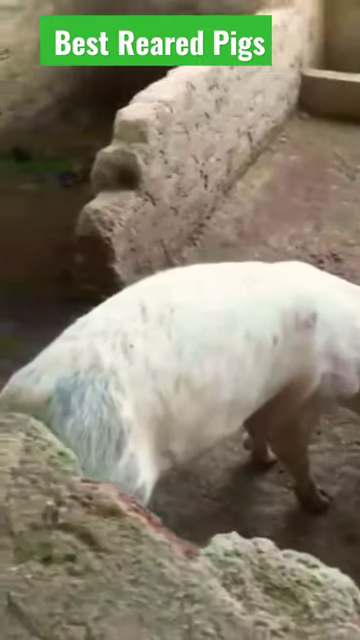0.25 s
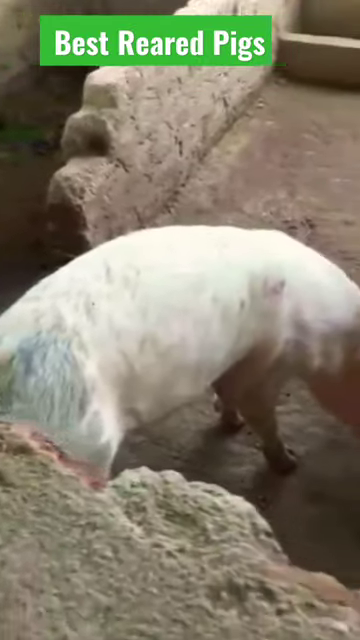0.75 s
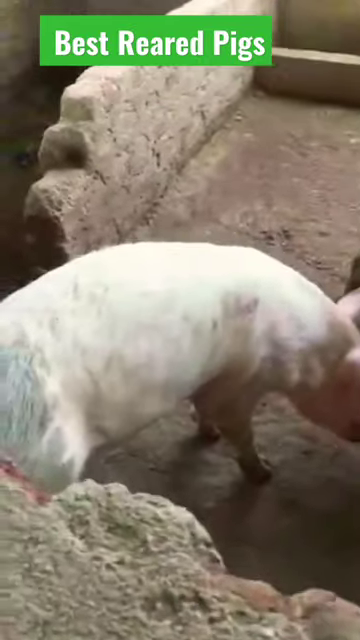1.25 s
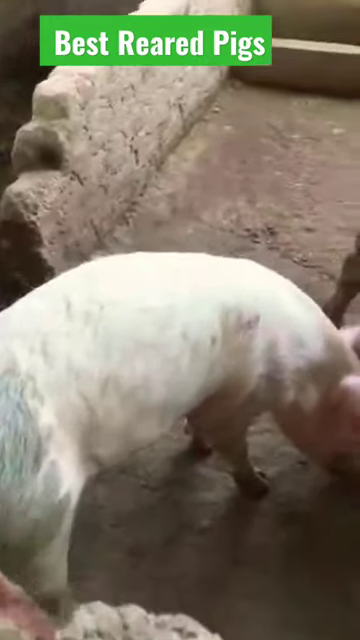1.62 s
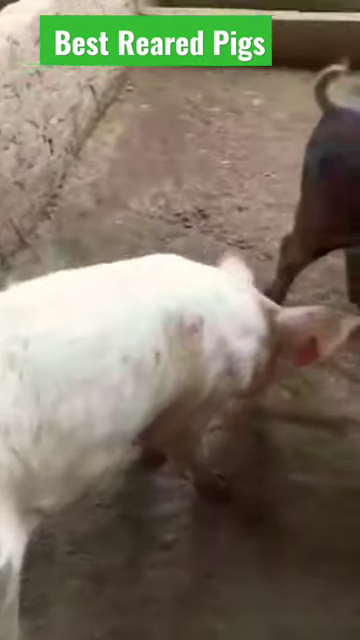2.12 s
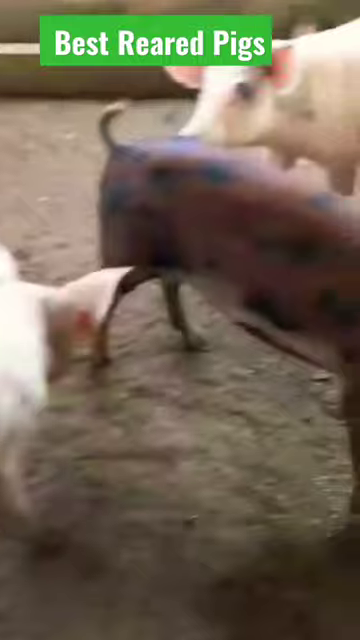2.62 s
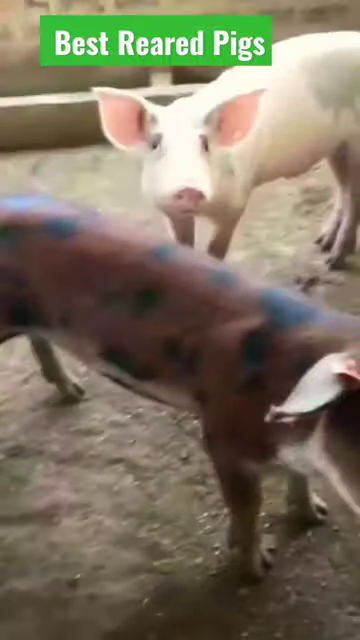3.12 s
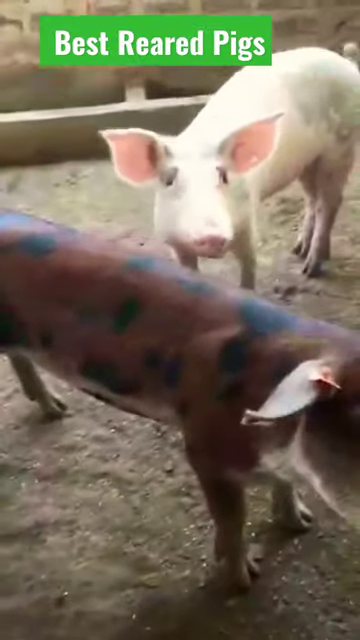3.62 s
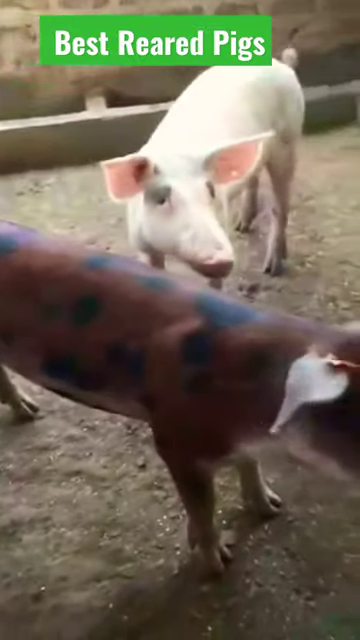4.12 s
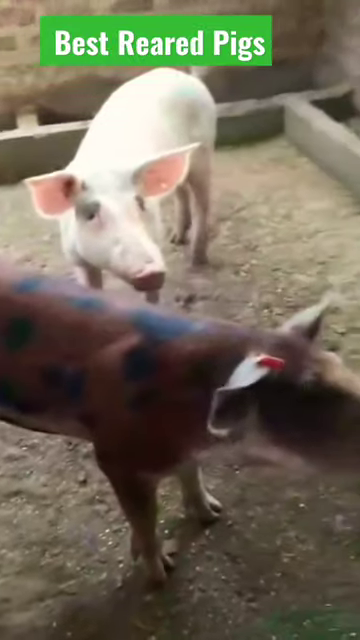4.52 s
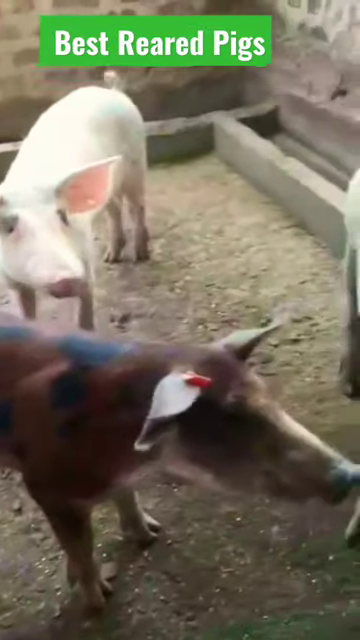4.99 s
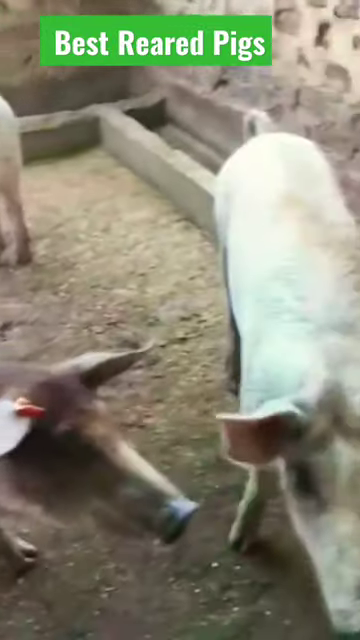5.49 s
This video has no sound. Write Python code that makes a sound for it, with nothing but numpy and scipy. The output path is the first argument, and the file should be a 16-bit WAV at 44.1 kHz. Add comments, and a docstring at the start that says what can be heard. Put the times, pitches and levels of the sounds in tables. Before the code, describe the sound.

In a concrete pen, several pigs shuffle, smack wetly and click their hooves throughout. A thin falling whistle comes early, then a low breathy grunt nearby. A faint distant whine follows, then a rougher breathy grunt, a stronger grunt with almost no breath, and a final rising whine. Wind thumps softly on the close handheld microphone, and the walls return a short echo.

```python
"""Pigs in a hard-walled pen, with smacking lips, hoof clicks and shuffling all the way through. Wind buffets
the microphone throughout. A thin whistle falls once, then a slow, breathy grunt follows close by. Next come a
faint whine farther off, a second breathy grunt, a third with hardly any breath, and a last whine that climbs.
Smacks are noise bursts ringing two cavities, grunts are pulses and breath through resonances, whines are
harmonics, the whistle is a wavering tone, shuffle and wind are shaped noise; the walls add a short echo."""
import sys
import numpy as np
from scipy import signal
from scipy.fft import rfft, irfft
from scipy.io import wavfile
from scipy.ndimage import uniform_filter1d

SR = 44100
rng = np.random.default_rng(int(sys.argv[2]) if len(sys.argv) > 2 else 0)


def store_wav(level_fs):
    """Save 16-bit WAV to argv[1]."""
    pcm = np.round(np.clip(np.atleast_2d(level_fs), -1, 1) * 32767)
    wavfile.write(sys.argv[1], SR, pcm.T.astype(np.int16))


N = 253575

# Chance peaks in the low wind noise, placed one by one. Each row: middle in seconds, level in dB, pitch in Hz,
# width at half height in seconds (never taken shorter than 0.003).
WIND_PEAKS = [(0.569, -29.5, 70, 0.037), (0.719, -26, 99, 0.0073), (0.789, -28, 94.5, 0.0072),
              (0.808, -28, 66.5, 0.023), (0.91, -28.5, 94, 0.0073), (1.105, -19, 87, 0.0022),
              (1.127, -27.5, 88, 0.0074), (1.302, -39, 65.3, 0.032), (1.777, -29.5, 59, 0.03),
              (1.896, -18.5, 140, 0.0075), (1.95, -25.5, 71, 0.019), (2.02, -20.5, 101, 0.0091),
              (2.276, -29, 102, 0.016), (2.465, -30, 94, 0.0024), (2.626, -27, 71, 0.013),
              (2.835, -30.5, 86, 0.026), (3.12, -34, 69, 0.025), (4.365, -30.5, 89.5, 0.012),
              (4.928, -21.5, 79, 0.0075), (4.971, -29, 90, 0.0036), (5.003, -31, 81, 0.013),
              (5.066, -15, 123, 0.012), (5.137, -14, 57, 0.0023), (5.307, -32.5, 109.6, 0.062),
              (5.425, -26, 89, 0.012), (5.611, -22, 90, 0.019), (5.677, -28.5, 75, 0.022)]
# Wind over time. Each row: time in seconds, rumble level in dB, flutter in dB compared with the rumble.
WIND = [(0, -60.5, -7.5), (0.15, -45.5, -15), (0.27, -65, -2), (0.5, -49.5, -18), (1.55, -45.5, -19.5),
        (1.68, -49, -19), (1.95, -24.5, -16.5), (2.12, -41.5, -17), (2.3, -36, -29), (2.37, -53.5, -21),
        (2.44, -37.5, -14), (2.55, -38.5, -35), (2.75, -50, -16.5), (3.25, -54, -5.5), (3.9, -64.5, 1.5),
        (4.22, -41.5, -9), (4.42, -50, -12.5), (4.52, -67, 2.5), (4.8, -57.5, -10.5), (4.95, -37.5, -17),
        (5.44, -34.5, -12.5), (5.62, -35.5, -11), (5.75, -48.5, -7)]
# Feet and snouts shuffling. Each row: time in seconds, resting level in dB, grit in dB compared with the level.
SHUFFLE = [(0, -43, -12), (0.15, -51, -9.5), (0.53, -57.5, -10.5), (0.75, -47, -15), (1.15, -52, -17),
           (1.3, -56.5, -9.5), (1.72, -55, -8), (2.25, -49, -14.5), (2.38, -52, -15.5), (2.55, -52, -0.5),
           (2.85, -52.5, -13), (3.12, -46.5, -9.5), (3.25, -43.5, -11.5), (3.6, -53.5, -17),
           (4.02, -50, -4.5), (4.6, -46, -11.5), (4.85, -56.5, -7), (5.1, -44.5, -7), (5.4, -41, -8),
           (5.55, -42, -14), (5.66, -41.5, -13.5), (5.75, -36, -9)]
# Tone colour of the shuffle. Each row: frequency in Hz, relative strength in dB per Hz.
SHUFFLE_TONE = [(210, -72), (350, -8.5), (600, -3), (950, -0.5), (1460, 0), (2690, -9), (3270, -10),
                (5500, -22), (7150, -39), (12100, -120)]
# Tone colour of wet hiss and grit. Each row: frequency in Hz, relative strength in dB per Hz.
HISS_TONE = [(2650, -0.5), (4500, -0.5), (6650, -4), (7570, -5.5), (9100, -8.5), (11900, -17.5),
             (13100, -64)]
# The falling whistle. Each row: time in seconds, pitch in Hz, level in dB.
WHISTLE = [(1.45, 7450, -86), (1.47, 7300, -75), (1.5, 6930, -67), (1.54, 6080, -58), (1.57, 5680, -71),
           (1.61, 5780, -57)]
# Hoarse whines from farther off. Each row: start, loudest moment and end in seconds, first and last pitch in Hz,
# top level in dB, level at start and end in dB compared with the top.
WHINES = [(3.277, 3.325, 3.6, 316, 318.5, -56.5, -34), (5.498, 5.734, 5.9, 323.5, 463, -49.5, -14)]
# Whine harmonics, lowest first. Each entry: relative level in dB.
WHINE_PARTIALS_DB = [4, 0, -31, -13]
# Resonances of the nose. Each row: frequency in Hz, width in Hz, relative level in dB.
SNOUT = [(616, 67, -4), (936, 145, -7.5), (1375, 69, 3), (1777, 84, 0.5), (2220, 130, -2), (2690, 80, -16),
         (3080, 220, -10.5), (3780, 176, -6), (4390, 88, -15), (5870, 1350, -27.5)]
# Upper resonances of the throat. Each row: frequency in Hz, width in Hz, typical level in dB.
THROAT = [(660, 71, -5), (1334, 99, -3.5), (1725, 110, -1), (2270, 88, 5)]
# Grunts. Each row: start, loudest moment and end in seconds, first and last pulses per second,
# pulse level in dB, pulse fade in dB per second, loudest breath in seconds, breath level in dB,
# mouth low-pass at the loudest moment in Hz, chest boom in dB, first and last pharynx resonance in Hz,
# timing spread of the pulses as a share of the first cycle.
GRUNTS = [(1.718, 1.806, 2.08, 31.02, 30.86, -30.5, 6.3, 1.85, -34, 360, -3, 331, 167, 0.052),
          (4.045, 4.214, 4.47, 44.07, 50.8, -32.5, 230, 4.21, -32.5, 430, -4, 288, 220, 0.14),
          (5.154, 5.211, 5.52, 27.42, 32.76, -22, 63, 5.33, -69, 1000, -1, 357, 168, 0.02)]
# Smacks and hoof clicks. Each row: time in seconds, level in dB, low and high cavity in Hz,
# high cavity in dB and wet hiss in dB (both compared with the level), length in seconds.
SMACKS = [(0.01, -30, 1194, 1900, -11, -15, 0.0031), (0.015, -38.5, 1620, 2000, 0, -4.5, 0.013),
          (0.182, -38.5, 1620, 1840, -8, -13, 0.01), (0.292, -34, 1330, 2700, 0, -24, 0.012),
          (0.317, -24, 1620, 2880, -11.5, -15, 0.025), (0.384, -30, 1360, 2330, -8, -40, 0.0062),
          (0.58, -42, 1055, 3560, -4.5, -46, 0.016), (0.611, -41, 970, 2070, -6, -8.5, 0.014),
          (0.69, -36.5, 1300, 2970, -8.5, -46, 0.023), (0.785, -39, 1500, 2430, -22, -26, 0.0054),
          (0.807, -28.5, 1405, 1975, 1, -6, 0.0078), (0.967, -37, 985, 3350, -7.5, -30, 0.01),
          (0.993, -31, 1430, 2870, -8, -10.5, 0.0073), (1.078, -37, 950, 1470, -10, -39, 0.0076),
          (1.104, -36.5, 1120, 3190, -7.5, -50, 0.016), (1.202, -33.5, 1300, 1830, -7.5, -23, 0.01),
          (1.333, -34, 1310, 3460, -6.5, -23, 0.012), (1.427, -37, 930, 1570, -8, -43, 0.034),
          (1.641, -30.5, 1286, 1620, -5.5, -20, 0.01), (1.662, -36.5, 1150, 3750, -10, -11.5, 0.0078),
          (2.08, -45.5, 1600, 3330, -1, -16, 0.018), (2.104, -39, 1610, 2440, -4, -3, 0.014),
          (2.143, -27, 1160, 1666, -1, -14, 0.0054), (2.167, -35.5, 1310, 1910, -7, -17, 0.0071),
          (2.183, -35, 791.3, 1510, -17, -35, 0.0022), (2.244, -38.5, 1290, 2130, -9, -28, 0.025),
          (2.276, -45, 1000, 3400, 7, 3, 0.0038), (2.313, -40, 955, 2200, -30, -43, 0.018),
          (2.424, -39.5, 1180, 3780, -7, -28, 0.014), (2.451, -40, 433, 910, -4, -33, 0.018),
          (2.479, -29.5, 1465, 2620, -10, -21, 0.011), (2.507, -44.5, 1540, 3600, -4, 0.5, 0.0086),
          (2.547, -31, 1320, 2060, 6, -9.5, 0.0061), (2.593, -37.5, 935, 2340, -3.5, -30, 0.0027),
          (2.615, -36, 905, 1500, -8.5, -30, 0.005), (2.652, -46, 905, 1800, -15, -35, 0.0044),
          (2.678, -38.5, 1680, 2210, -9, -24, 0.0031), (2.731, -32, 1280, 2260, -3.5, -41, 0.0018),
          (2.817, -39.5, 1086, 2330, -25, -35, 0.012), (2.901, -40, 597, 1480, -20, -47, 0.023),
          (3.007, -22, 1185, 1976, 0.5, -11.5, 0.004), (3.281, -48, 593, 2070, 1, -0.5, 0.013),
          (3.325, -22.5, 1124, 1590, -5, -53, 0.0039), (3.351, -32, 900, 1700, -29, -43, 0.0043),
          (3.418, -41, 1060, 2680, 3, -3.5, 0.0065), (3.459, -20, 1397, 1620, -6, -10.5, 0.0034),
          (3.662, -21.5, 1357, 3120, -15, -9.5, 0.011), (3.755, -29, 1010, 3950, -21, -10, 0.0037),
          (3.777, -44.5, 1130, 2690, 11.5, 4.5, 0.003), (3.836, -38, 1150, 1870, -13, -37, 0.0067),
          (3.9, -23, 1110, 1920, -16, -22, 0.0099), (4.06, -31, 1080, 2170, -16, -19, 0.017),
          (4.127, -24, 1390, 2340, -2.5, -17, 0.0058), (4.179, -24, 660, 938, -5.5, -27, 0.0023),
          (4.228, -25, 1530, 2840, -3.5, -10.5, 0.015), (4.255, -30.5, 1440, 1860, 1, -14, 0.0098),
          (4.301, -34.5, 1205, 3000, 3.5, 1.5, 0.0033), (4.483, -27, 1480, 3230, -4, -0.5, 0.0048),
          (4.579, -30.5, 1010, 1400, -11, -20.5, 0.0052), (4.593, -39, 1250, 2290, -2, -37, 0.005),
          (4.657, -37.5, 1590, 2300, -8, -14, 0.0068), (4.673, -39.5, 1560, 2900, -5, -10.5, 0.017),
          (4.726, -29.5, 685, 1310, -1, -7.5, 0.005), (4.878, -39.5, 930, 1470, -27, -22, 0.014),
          (4.908, -44, 1380, 2930, -7.5, -24, 0.014), (4.973, -38.5, 640, 1380, -19, -23, 0.0025),
          (4.986, -33, 1020, 2050, -14, -27, 0.014), (5.005, -23.5, 1105, 2040, -6, -19, 0.0082),
          (5.057, -39.5, 1540, 3300, 6.5, 2.5, 0.021), (5.086, -28.5, 1550, 2490, -2.5, -11.5, 0.0088),
          (5.122, -28.5, 1830, 2180, 2.5, -39, 0.0037), (5.322, -21.5, 1072, 1780, -14, -17, 0.0082),
          (5.413, -34, 664, 1020, -6, -37, 0.017), (5.455, -32.5, 1320, 4020, -19, 9.5, 0.0029),
          (5.475, -29, 1390, 2250, -5, -12, 0.01), ]

PEN_T60_S, PEN_TREBLE_T60_S = 0.24, 0.19  # time for the echo to fall by 60 dB
PEN_DB = -8.5
GRUNT_PEN_DB = -6  # the grunts are near, so the walls add less
# Each smack stirs the shuffle up; the kick is set this far under the smack's level.
STIR_DB, STIR_RISE_S, STIR_FADE_S = -25.5, 0.006, 0.032
GRUNT_ATTACK_S, PULSE_SWELL_DB_PER_S = 0.017, 68
BREATH_SWELL_DB_PER_S, BREATH_FADE_DB_PER_S = 137, 138
FIRST_PULSE = 0.7  # share of a cycle already gone when a grunt starts
CHEST_HZ = 186
PHARYNX_WIDTH_HZ = 67  # the pharynx resonance sinks through a grunt
MOUTH_CLOSES_TO = 0.24  # share of the mouth low-pass left at the end of a grunt
SHARPNESS = 5.5  # cavity frequency divided by its width
LEAD_S, LEAD_DB = 0.012, -17  # faint sound ahead of each smack
LONGEST_RISE_S, SPRAY_RISE_S = 0.003, 0.006
CUTOFF_HZ = 13450  # from here up, the sound is at least 30 dB down


def amp(db):
    """Turn dB into gain."""
    return 10 ** (np.asarray(db) / 20)


def rms_one(x):
    """Scale a sound to an average strength (rms) of 1."""
    return x / np.sqrt(np.mean(x ** 2) + 1e-20)


def in_time(rows, **outside):
    """Draw straight lines between table rows, giving each column a value at every sample."""
    s, *columns = np.transpose(rows)
    t = np.arange(N) / SR
    return [np.interp(t, s, column, **outside) for column in columns]


def coloured(spectrum):
    """Noise with a given tone colour, rms 1."""
    hz, db = np.transpose(spectrum)
    bins_hz = np.arange(N // 2 + 1) * SR / N + 1  # the 1 avoids log(0)
    shape = amp(np.interp(np.log(bins_hz), np.log(hz), db, left=-90, right=-90))
    return rms_one(irfft(rfft(rng.standard_normal(N)) * shape, N))


def band(x, low_hz, high_hz):
    """Keep the sound between two frequencies."""
    return signal.sosfilt(signal.butter(2, [low_hz, high_hz], "band", fs=SR, output="sos"), x)


def drift(rate_hz):
    """Smoothed random wandering, rms 1; a higher rate wanders faster."""
    r = np.exp(-2 * np.pi * rate_hz / SR)
    settled = signal.lfilter([1], [1, -2 * r, r * r], rng.standard_normal(N + SR))[SR:]
    return rms_one(settled)


def resonance(x, hz, width_hz):
    """One ringing resonance with gain 1 at its top."""
    r = np.exp(-np.pi * width_hz / SR)
    feedback = [1, -2 * r * np.cos(2 * np.pi * hz / SR), r * r]
    return signal.lfilter(np.array([1, 0, -1]) * (1 - r * r) / 2, feedback, x)


def tract(x, modes):
    """Resonances side by side with alternating signs, each steepened by a second, wider one."""
    out = 0
    for k, (hz, width, db) in enumerate(modes):
        steep = resonance(resonance(x, hz, 7.1 * width), hz, width)
        out = out + (-1) ** k * amp(db) * steep
    return out


def peaked(t, top_s, top_db, swell_db_per_s, fade_db_per_s):
    """Gain that swells to a peak and fades, straight in dB."""
    drop_db = np.where(t < top_s, swell_db_per_s * (top_s - t), fade_db_per_s * (t - top_s))
    return amp(top_db - drop_db)


def pen(x, first_echo_s=0.0025):
    """Dense wall reflections, made of fading noise; the treble dies sooner."""
    t = np.arange(SR // 2) / SR
    noise = rng.standard_normal((2, len(t)))
    low = band(noise[0], 110, 4800) * amp(-60 * t / PEN_T60_S)
    treble = band(noise[1], 5240, 10600) * amp(-60 * t / PEN_TREBLE_T60_S)
    tail = (low + treble) * (1 - np.exp(-(t / first_echo_s) ** 2))
    tail /= np.sqrt(np.sum(tail ** 2))
    return amp(PEN_DB) * signal.fftconvolve(x, tail)[:N]


def wind(lumpy_db=2.0):
    """Lumpy low noise on the microphone, with chance peaks placed one by one as short swells of a low tone."""
    rumble_db, flutter_db = in_time(WIND)
    rumble = rms_one(band(band(rng.standard_normal(N), 42, 110), 30, 230))
    flutter = rms_one(band(rng.standard_normal(N), 158, 333))
    flutter_gain = amp(flutter_db + 3.0 * drift(18.7))
    out = amp(rumble_db + lumpy_db * drift(9.4)) * (rumble + flutter_gain * flutter)
    t = np.arange(N) / SR
    phases = rng.uniform(0, 2 * np.pi, len(WIND_PEAKS))
    for (s, db, hz, width), phase in zip(WIND_PEAKS, phases):
        near = slice(round((s - .06) * SR), round((s + .06) * SR))
        since = t[near] - s
        swell = np.exp(-np.log(16) * (since / max(width, .003)) ** 2)
        out[near] += amp(db) * swell * np.cos(2 * np.pi * hz * since + phase)
    return out


def stir():
    """Gain that rises after each smack and settles again."""
    s, db = np.transpose(SMACKS)[:2]
    kicks = np.zeros(N)
    kicks[(s * SR).astype(int)] = amp(db + STIR_DB)
    rise, fade = np.exp(-1 / (STIR_RISE_S * SR)), np.exp(-1 / (STIR_FADE_S * SR))
    fading = signal.lfilter([1], [1, -fade], kicks)
    return signal.lfilter([1 - rise], [1, -rise], fading)


def shuffle(ticks_per_s=10.0, tick_db=-11, crackle_db=-0.5):
    """A noise bed that wavers band by band, with small random ticks, each with a colour of its own."""
    level_db, grit_db = in_time(SHUFFLE)
    grit_gain = amp(grit_db + crackle_db * drift(150) + 3.6 * drift(5.2))
    texture = coloured(SHUFFLE_TONE) + grit_gain * coloured(HISS_TONE)
    bed = (amp(level_db) + stir()) * texture
    moments = (rng.random(N) < ticks_per_s / SR) * amp(rng.normal(0, 3.3, N))
    together = drift(13.0)  # wavering shared by all bands
    edges_hz = np.geomspace(200, 14000, num=15)
    out = 0
    for low, high in zip(edges_hz, edges_hz[1:]):
        sizes = moments * amp(3.5 * np.minimum(rng.exponential(1, N), 3))
        softened = uniform_filter1d(sizes, size=120)
        ticks = signal.lfilter([1], [1, -np.exp(-1 / (0.033 * SR))], softened)  # 33 ms fade
        waver_db = 1.5 * (together + drift(20))
        out = out + band(bed, low, high) * (amp(waver_db) + amp(tick_db) * ticks)
    return out


def whistle(breathy_hz=250):
    """A gliding tone whose randomly wavering strength blurs it into a narrow band of noise."""
    hz, db = in_time(WHISTLE)
    sounding = in_time(WHISTLE, left=0, right=0)[0] > 0
    tone = np.sin(2 * np.pi * np.cumsum(hz) / SR)
    return sounding * amp(db) * (drift(breathy_hz) + 0.79) * tone


def whines(waver=0.0119, hoarse_db=2.5):
    """A few harmonics of unsteady strength on a wavering pitch that climbs, slightly or clearly."""
    out, t = 0, np.arange(N) / SR
    for start, top, end, first_hz, last_hz, db, edge_db in WHINES:
        hz = np.interp(t, [start, end], [first_hz, last_hz])
        phase = 2 * np.pi * np.cumsum(hz * (1 + waver * drift(27.3))) / SR
        swell_db = edge_db * np.interp(t, [start, top, end], [1, 0, 1])
        gain = amp(db + swell_db) * (t > start) * (t < end)
        for k, part_db in enumerate(WHINE_PARTIALS_DB):
            strength = amp(part_db + hoarse_db * drift(32))
            out = out + gain * strength * np.sin((k + 1) * phase)
    return out


def grunts(gate=.3, rough_db=1.5, rasp_db=2.3):
    """Vocal folds open in slow pulses and ring a throat that lengthens; breath gated by them hisses in the snout."""
    voice, breath, t = np.zeros(N + SR), 0, np.arange(N) / SR
    for (start, top, end, first_rate, last_rate, pulse_db, fade, breath_top, breath_db,
         mouth_hz, chest_db, first_hz, last_hz, jitter) in GRUNTS:
        on = (t >= start) & (t < end)
        rate = np.interp(t, [start, end], [first_rate, last_rate])
        cycle = np.cumsum(on * rate) / SR + FIRST_PULSE
        attack = np.clip((t - start) / GRUNT_ATTACK_S, 0, 1)
        effort = attack * peaked(t, top, pulse_db, PULSE_SWELL_DB_PER_S, fade)
        pulse_starts = np.flatnonzero(np.diff(np.floor(cycle)))
        chance = rng.standard_normal((30, 2 + len(THROAT)))  # one row per pulse
        for at, (late, strong, *tints) in zip(pulse_starts, chance):
            pharynx_hz = np.interp(t[at], [start, end], [first_hz, last_hz])
            opening = np.interp(t[at], [top, end], [1, MOUTH_CLOSES_TO])
            click = np.eye(1, SR // 20)[0]
            puff = signal.lfilter(*signal.butter(3, mouth_hz * opening, fs=SR), click)
            lower = [(CHEST_HZ, 70, chest_db), (pharynx_hz, PHARYNX_WIDTH_HZ, 0)]
            upper = [(hz, width, db + 2 * rough_db * tint)
                     for (hz, width, db), tint in zip(THROAT, tints)]
            pulse = tract(puff, lower + upper)
            at += round(jitter * late * SR / first_rate)
            gain = effort[at] * amp(rough_db * strong)
            voice[at:at + len(pulse)] -= gain * pulse / np.abs(pulse).max()
        flow = peaked(t, breath_top, breath_db, BREATH_SWELL_DB_PER_S, BREATH_FADE_DB_PER_S)
        # breath is strongest as each pulse begins
        breath = breath + on * flow * (1 - gate + gate * np.exp(-3.0 * (cycle % 1)))
    snout_noise = rms_one(tract(rng.standard_normal(N), SNOUT))
    return voice[:N] + breath * amp(rasp_db * drift(94)) * snout_noise


def smacks(rise_share=0.533, snap=10.1, ring_db=-8, crackle_db=6.0):
    """A short burst of noise rings two cavities and carries a wet hiss with a colour of its own."""
    out = np.zeros(N + SR)
    t = np.arange(SR // 6) / SR - LEAD_S
    since = np.maximum(t, 0)
    lead = amp(LEAD_DB) * np.exp(-4 * np.abs(t) / LEAD_S)  # a faint wet sound runs ahead
    hiss = coloured(HISS_TONE) * amp(crackle_db * drift(400))  # spray comes in droplets
    noises = rng.standard_normal((len(SMACKS), len(t)))
    lowest_hz, highest_hz = [3090, 4120, 5920, 8020], [4420, 6250, 7820, 10900]
    hiss_hz = rng.uniform(lowest_hz, highest_hz, (len(SMACKS), 4))
    for (s, db, low_hz, high_hz, high_db, hiss_db, length), noise, tints in zip(SMACKS, noises, hiss_hz):
        at, length = max(round((s - LEAD_S) * SR), 0), max(length, .001)
        rise = 1 - np.exp(-(since / min(rise_share * length, LONGEST_RISE_S)) ** 2)
        burst = lead + rise * np.exp(-(since / (1.443 * length)) ** 1.23)
        burst /= burst.max()
        strike = burst * noise
        strike[np.argmax(burst)] += snap  # the lips part with one snap
        rings = []
        for hz in (low_hz, high_hz):
            body = resonance(resonance(strike, hz, hz / SHARPNESS), hz, 2 * hz / SHARPNESS)
            after = resonance(body, hz, 130)  # a narrow resonance sings on
            rings.append(body / np.abs(body).max() + amp(ring_db) * after / np.abs(after).max())
        spray = np.resize(hiss[at:], len(t))
        tinted = rms_one(0.61 * spray + sum(resonance(spray, hz, 270) for hz in tints))
        wet = (lead + burst * (1 - np.exp(-since / SPRAY_RISE_S))) * tinted
        smack = 0.54 * rings[0] + amp(high_db) * rings[1] + amp(hiss_db) * wet
        out[at:at + len(t)] += amp(db) * smack
    return out[:N]


def scene():
    """Add the pigs, their echo from the walls, the shuffling and the wind."""
    near = grunts()
    others = smacks() + whines() + whistle()
    echo = pen(others + amp(GRUNT_PEN_DB) * near)
    return (near + others + echo + shuffle() + wind())[None]


def record(dry):
    """The microphone loses the deepest bass; the top is cut."""
    thin = signal.sosfilt(signal.butter(3, 36, "high", fs=SR, output="sos"), dry)
    return signal.sosfilt(signal.cheby2(12, 30, CUTOFF_HZ, fs=SR, output="sos"), thin)


dry = scene()
out = record(dry)
store_wav(out)
```